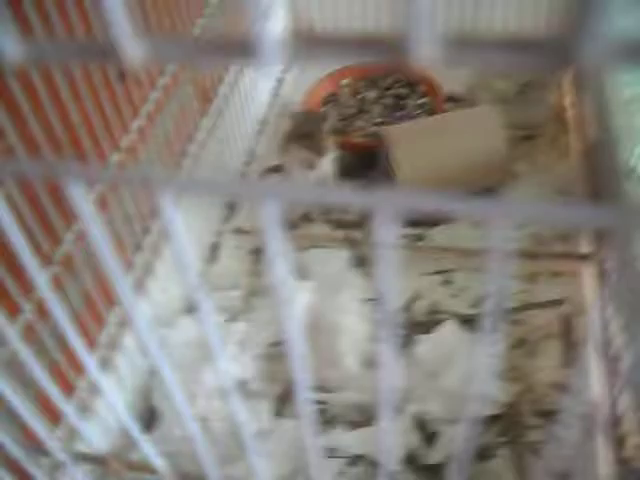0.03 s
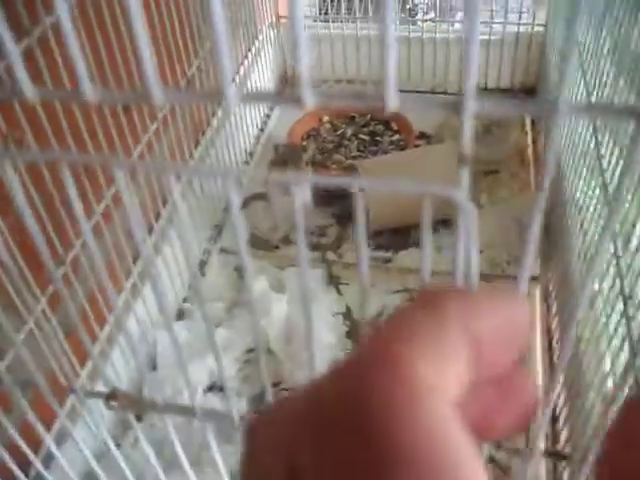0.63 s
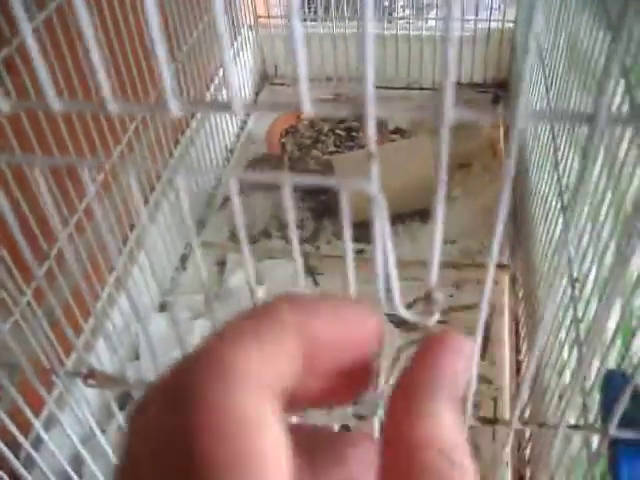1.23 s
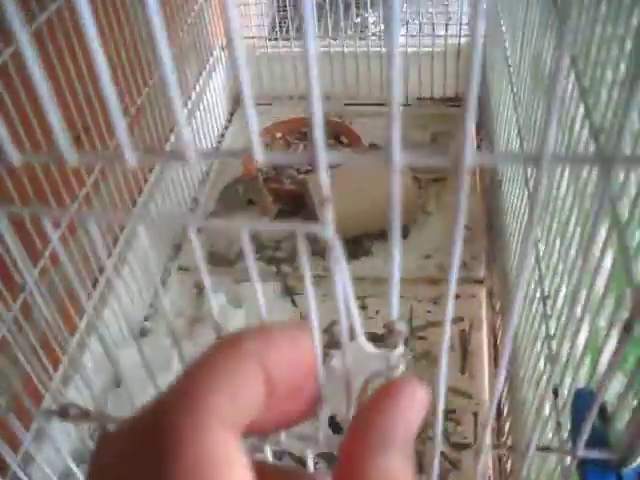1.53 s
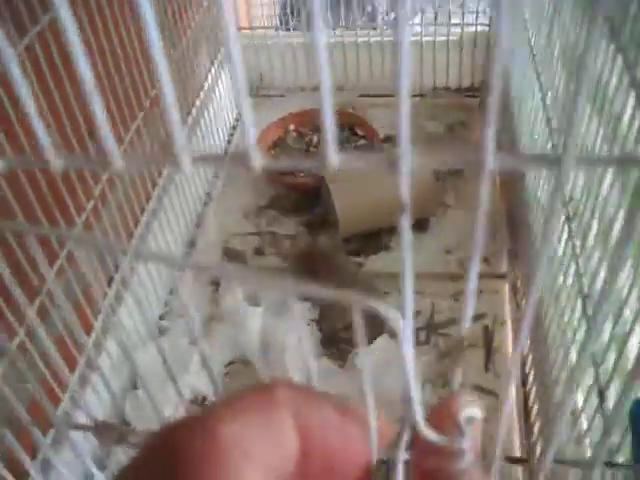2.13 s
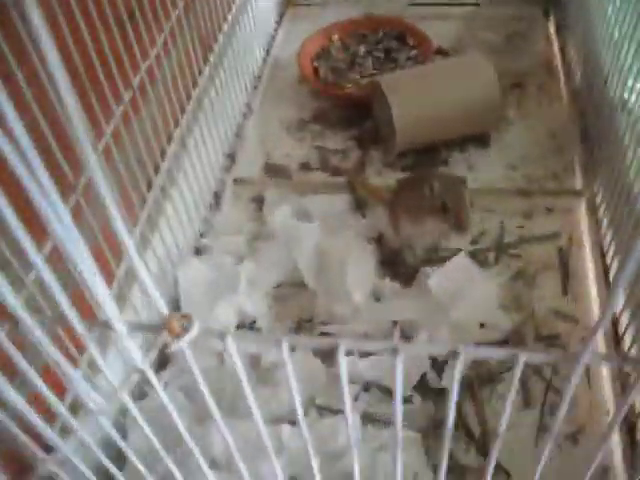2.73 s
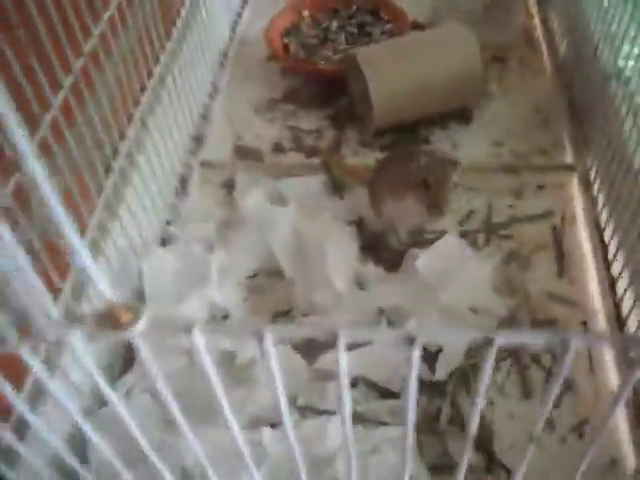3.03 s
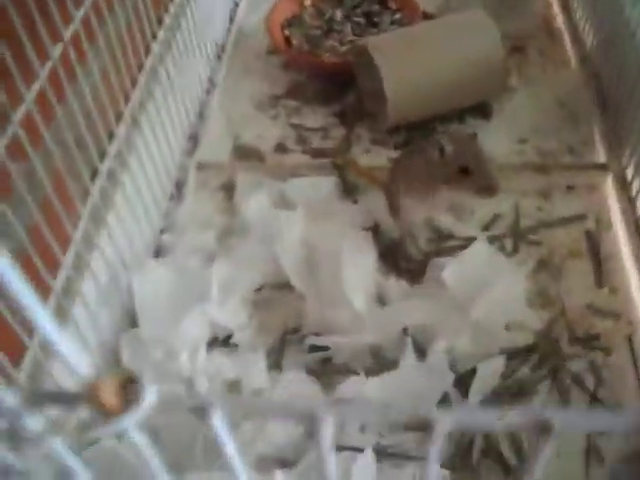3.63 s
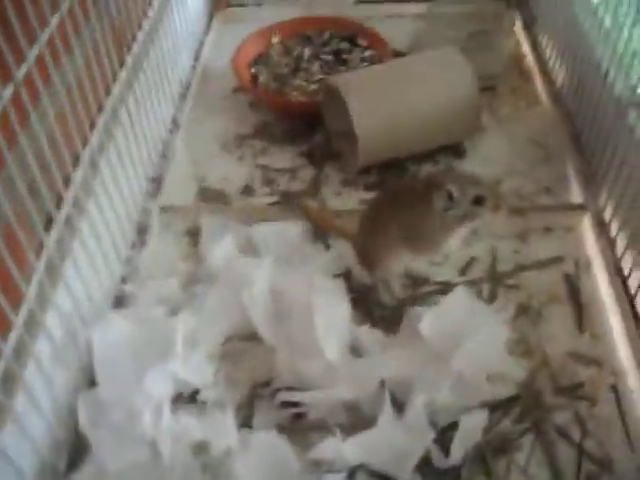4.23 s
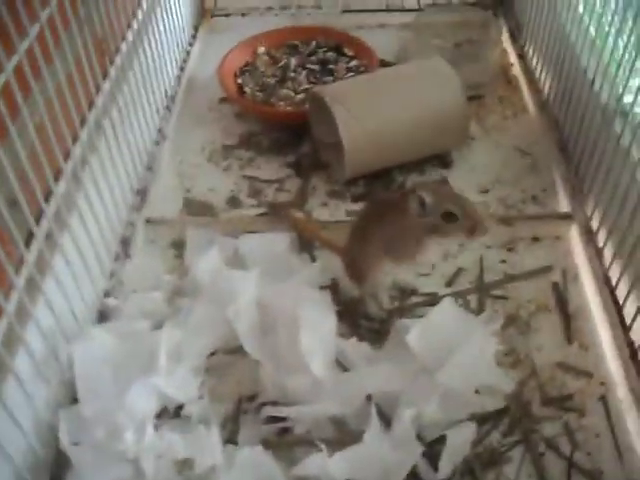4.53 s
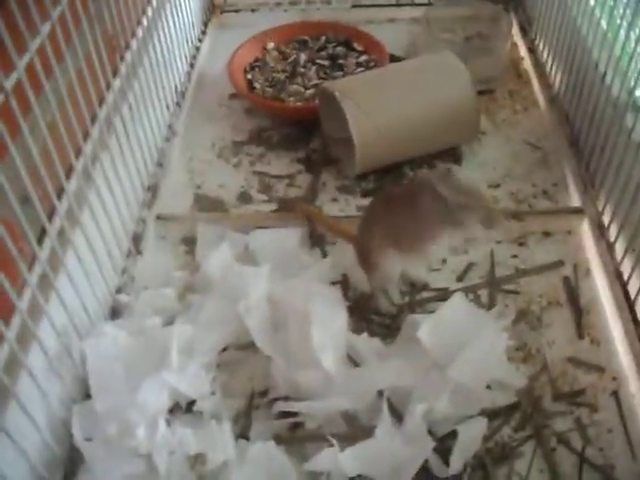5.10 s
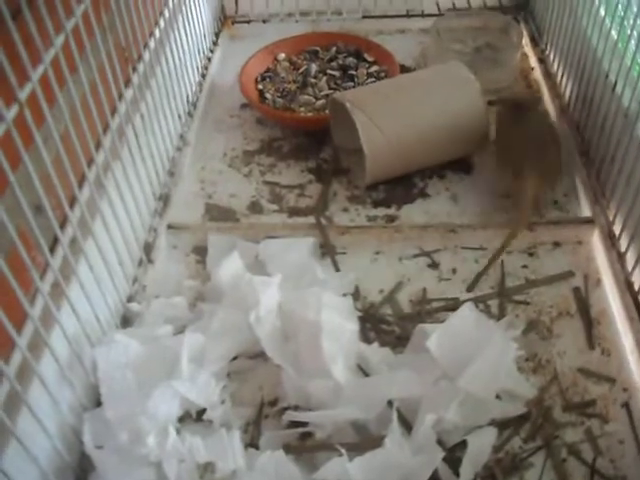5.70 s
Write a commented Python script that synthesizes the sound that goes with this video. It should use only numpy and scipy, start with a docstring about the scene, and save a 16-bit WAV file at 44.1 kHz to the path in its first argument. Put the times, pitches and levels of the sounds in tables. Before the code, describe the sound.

Close to the microphone, fingers work the latch of a small wire cage with light scrapes and soft bumps. The door springs open with a rattling clank, and the bars ring on briefly. A gerbil then scratches and rustles in its paper bedding, making small dry clicks, while the wire scrapes lightly a few more times. Birds call faintly far off, over the quiet room's low rumble and microphone hiss.

```python
"""Opening a gerbil's cage

Close to the microphone, fingers work the latch of a small wire cage; the door springs open with a
rattling clank and the bars ring on. A gerbil scratches and rustles in its paper bedding, and the hand
bumps softly. Far off, birds call faintly. The room is quiet: a low rumble under the hiss of a small
camera's microphone, which opens a moment late."""
import sys
import numpy as np
from scipy import signal
from scipy.fft import rfft, irfft
from scipy.io import wavfile
from scipy.ndimage import uniform_filter1d

SR = 44100
rng = np.random.default_rng(int(sys.argv[2]) if len(sys.argv) > 2 else 0)


def store_pcm(level_fs):
    """Save levels as 16-bit WAV."""
    pcm = np.round(np.clip(level_fs, -1, 1) * 32767).astype(np.int16)
    wavfile.write(sys.argv[1], SR, np.atleast_2d(pcm).T)


N = 254016

# spectrum of claws on dry paper: (frequency [Hz], relative level [dB])
CLAW_SPECTRUM = [(200, -19), (900, 0), (3000, 1), (6000, -2.5), (9500, -6), (12000, -31)]
# bouts of scrabbling paws: (start [s], length [s], crackle level [dB])
SCRABBLE_BOUTS = [(2.41, 0.33, -64.5), (3.063, 0.098, -60.5), (3.43, 0.24, -63.5), (3.759, .45, -68)]


def amp(db):
    """Decibels to gain."""
    return 10 ** (np.asarray(db) / 20)


def unit_rms(x):
    """Scales to rms 1."""
    return x / np.sqrt(np.mean(x ** 2) + 1e-20)


def curve_at(points, hz):
    """Joins (Hz, value) points by lines on a log-frequency axis."""
    point_hz, value = np.transpose(points)
    return np.interp(np.log(hz + 1), np.log(point_hz + 1), value)


def clock(length):
    """Sample times over a length in seconds."""
    return np.arange(max(int(length * SR), 2)) / SR


def add(mix, start, sound):
    """Mixes a sound in at a start time in seconds."""
    part = mix[round(start * SR):][:len(sound)]
    part += sound[:len(part)]


def coloured(x, spectrum):
    """Filters a signal by a (Hz, dB) spectrum, at rms 1."""
    gain = amp(curve_at(spectrum, np.fft.rfftfreq(len(x), 1 / SR)))
    return unit_rms(irfft(rfft(x) * gain, len(x)))


def resonate(x, hz, width_hz):
    """One resonance with a peak gain near 1."""
    radius = np.exp(-np.pi * width_hz / SR)
    return 2 * signal.lfilter([1 - radius], [1, -radius * np.exp(2j * np.pi * hz / SR)], x).real


def grains(size, per_s, spread_db):
    """Random clicks of either sign, a few of them large."""
    strength = amp(spread_db * np.minimum(rng.exponential(1, size), np.pi))
    return strength * rng.choice([-1, 1], size) * (rng.random(size) < per_s / SR)


def drift(per_s):
    """Random wandering with per_s turning points a second, rms 1."""
    knots = rng.standard_normal(N // 20)
    return unit_rms(np.interp(np.arange(N) / SR * per_s, np.arange(len(knots)), knots))


def room_tone(rumble_db=-54.5, waver_db=1.5, hiss_db=-72):
    """The quiet room: a rumble whose low end wavers gently, under steady microphone hiss."""
    # spectra of the room and of the microphone's own noise: (frequency [Hz], relative level [dB])
    room_spectrum = [(12, -27), (20, 0), (79, 0), (192, -7.5), (249, -12), (332, -14.5), (408, -16.5),
                     (544, -15), (782, -17.5), (1040, -16), (1220, -19.5), (2660, -25.5), (4350, -28),
                     (10000, -36.5), (13000, -69), (22000, -120)]
    hiss_spectrum = [(1000, 0.5), (5000, 0), (9000, 3.5), (10200, 3), (11000, -14), (11700, -13),
                     (12300, -36)]
    rumble = amp(rumble_db) * coloured(rng.standard_normal(N), room_spectrum)
    low_end = signal.sosfilt(signal.butter(2, 400, fs=SR, output="sos"), rumble)
    waver = low_end * (amp(waver_db * drift(per_s=21)) - 1)
    hiss = amp(hiss_db) * coloured(rng.standard_normal(N), hiss_spectrum)
    return rumble + waver + hiss


def twitter_notes(note_s=0.029, arch=0.079, spread_hz=224):
    """Far birds twitter in strings of tiny notes around one pitch; gives rows of bird calls."""
    # runs of twittering: (start [s], length [s], level [dB], pitch [Hz])
    runs = [(0.358, .5, -72, 4850), (1.452, .25, -72.5, 4500), (5.21, .08, -68.5, 4250)]
    return [(start + k * note_s, note_s, db, hz + spread_hz * step, arch)
            for start, length, db, hz in runs
            for k, step in enumerate(rng.standard_normal(20)) if k * note_s < length]


def distant_birds(hoarse_hz=75, scatter_db=-8, scatter_s=0.021):
    """Arched, slightly hoarse whistles, blurred by reflections on their long way to the microphone."""
    # single calls: (start [s], length [s], level [dB], top pitch [Hz], arch [share of the pitch])
    calls = [(2.819, 0.055, -59, 3910, 0.0083), (3.262, 0.056, -59.5, 4160, 0.028),
             (3.86, 0.073, -65, 3940, 0.043), (5.206, 0.059, -60, 1454, 0.146),
             (5.649, 0.1, -57.5, 1835, 0.59)]
    direct = np.zeros(N)
    for start, length, db, hz, arch in calls + twitter_notes():
        position = np.linspace(-1, 1, len(clock(length)))
        pitch = hz * (1 - arch * position ** 2) + hoarse_hz * drift(per_s=400)[:len(position)]
        swell = np.sqrt(1 - position ** 2)
        add(direct, start, amp(db) * swell * np.sin(2 * np.pi * np.cumsum(pitch) / SR))
    t = clock(0.2)
    reflections = rng.standard_normal(len(t)) * np.exp(-t / scatter_s)
    reflections /= np.linalg.norm(reflections)
    return direct + amp(scatter_db) * signal.fftconvolve(direct, reflections)[:N]


def hand(width_hz=220, decay_s=0.022, rise_s=0.0012):
    """Soft flesh gives dull, quickly damped bumps."""
    # bumps of the hand: (time [s], level [dB], pitch [Hz])
    bumps = [(.52, -47, 680), (.526, -41.5, 300), (.637, -52, 430), (1.155, -52, 303), (3.619, -48, 320),
             (4.082, -51.5, 298), (5.292, -52, 513), (5.325, -52.5, 268), (5.599, -52.5, 152)]
    out, t = np.zeros(N), clock(0.54)
    for start, db, hz in bumps:
        thud = resonate(rng.standard_normal(len(t)), hz, width_hz)
        thud = unit_rms(resonate(thud, hz, 3 * width_hz))
        add(out, start, amp(db) * thud * np.exp(-t / decay_s) * (1 - np.exp(-t / rise_s)))
    return out


def movements(rows, attack_s=0.0091, release_s=0.037):
    """Gain over time of (start, length, dB) movements: each swells quickly, holds and dies away."""
    gain = np.zeros(N)
    for start, length, db in rows:
        t = clock(length + 1)
        release = np.exp(-np.maximum(t - length, 0) / release_s)
        add(gain, start, amp(db) * np.minimum(t / attack_s, 1) * release)
    return gain


def bedding(rustle_db=-4, clump_db=4.5, crease_s=0.0018, fidget_from_s=3.1, fidget_db=-66):
    """Shifting paper: a dull grainy rustle, and sparse bright crackles as creases give way."""
    # spectrum of the rustling paper: (frequency [Hz], relative level [dB])
    paper_spectrum = [(150, -5), (500, -4), (1100, 2), (2000, -7), (4000, -20), (9000, -27.5), (12000, -52)]
    # the gerbil shifts its body: (start [s], length [s], level before rustle_db [dB])
    stirs = [(2.995, .09, -56), (3.45, 0.19, -61), (3.9, .4, -57.5), (4.64, 0.031, -54.5), (5.22, .2, -63)]
    fidget = movements([(fidget_from_s, N / SR, fidget_db)])  # out in the open it never keeps still
    stirring = np.hypot(movements(stirs), fidget)
    paper = coloured(grains(N, per_s=1500, spread_db=3.5), paper_spectrum)
    crease_decay = np.exp(-clock(0.02) / crease_s)
    creases = signal.fftconvolve(abs(grains(N, per_s=300, spread_db=3.0)), crease_decay)[:N]
    crackle = coloured(creases * rng.standard_normal(N), CLAW_SPECTRUM)
    rustle = paper * stirring * amp(rustle_db + clump_db * drift(per_s=25))
    return rustle + crackle * movements(SCRABBLE_BOUTS)


def small_snaps(per_s=17, lift_db=15.5, spread_db=0.5, hz=2680, spread_octaves=0.51, crumble_db=-6):
    """Light claw contacts fall at random through each bout; gives rows of gerbil snaps."""
    rows = []
    for start, length, crackle_db in SCRABBLE_BOUTS:
        for k, (jitter, force, detune) in enumerate(rng.standard_normal((20, 3))):
            delay = abs(k + jitter / 2) / per_s
            db = crackle_db + lift_db + spread_db * force
            if delay < length:
                rows.append((start + delay, db, hz * 2 ** (spread_octaves * detune), crumble_db))
    return rows


def gerbil(gain_db=-3, ring_db=7, snap_s=0.00031, crumble_s=0.0055, echo_db=-22, echo_s=0.026):
    """Claws and teeth on paper, seed and tray: dry snaps that ring and crumble, with a trace of room."""
    # the sharpest snaps: (time [s], peak before gain_db [dB], pitch [Hz], crumble against snap [dB])
    sharp_snaps = [(0.845, -47.5, 2460, -3), (2.4006, -44, 2840, 1), (2.567, -55, 3390, -2),
                   (2.8785, -43, 3230, -10), (3.104, -57, 1900, -5), (3.1423, -50.5, 2820, -1),
                   (3.3605, -44.5, 3100, -8), (3.3842, -45, 2980, -4), (3.458, -42, 1920, -5),
                   (3.61, -40.5, 1800, -4), (3.6236, -37.5, 2400, -9), (3.644, -46, 2440, -2),
                   (3.6737, -43, 3200, -14), (3.9134, -50, 3120, -4), (3.9466, -41.5, 5000, -6),
                   (4.0402, -42, 4630, 2), (4.137, -44.5, 4770, -2), (4.2846, -43, 1810, -6),
                   (4.4105, -45, 1680, 0), (4.8592, -46, 2350, -1), (5.013, -46, 1900, -4),
                   (5.142, -50, 2430, -8)]
    out, t = np.zeros(N), clock(0.22)
    for start, db, hz, crumble_db in sharp_snaps + small_snaps():
        fibres = coloured(rng.standard_normal(len(t)), CLAW_SPECTRUM)
        cutoff_hz = min(3.4 * hz, SR / 3)  # thicker pieces ring lower and carry less treble
        fibres = signal.sosfilt(signal.butter(1, cutoff_hz, fs=SR, output="sos"), fibres)
        fibres += amp(ring_db) * resonate(fibres, hz, width_hz=800)
        snap = (t / snap_s * np.exp(1 - t / snap_s)) ** 2
        tail = amp(crumble_db) * np.exp(-t / crumble_s) + amp(echo_db) * np.exp(-t / echo_s)
        scratch = fibres * (snap + tail * (1 - np.exp(-t / snap_s)))
        peak = np.sqrt(uniform_filter1d(scratch ** 2, size=44).max())  # loudest millisecond
        add(out, start, amp(db + gain_db) * scratch / peak)
    return out


def cage_knock(tilt_db, clatter_t60=0.15, rise_s=0.00025, return_gain=0.27, return_s=0.01197):
    """One knock on the cage: a brief clatter, then the dense afterring of many wires."""
    # spectrum of the struck cage: (frequency [Hz], relative level [dB])
    cage_spectrum = [(35, -9), (80, -3), (180, -5), (310, -7), (370, -15.5), (490, -6.5), (600, -1),
                     (800, -3.5), (1200, -7.5), (1900, -10), (3300, -15), (4000, -19), (8000, -26),
                     (10000, -32.5), (12000, -62)]
    # bands in which the wires ring on: (centre [Hz], level against the clatter [dB], t60 [s])
    ring_bands = [(90, -29, 0.31), (380, -11, 1.4), (680, -15.5, 2.98), (944, -16, 0.75), (1850, -13, 0.9),
                  (3200, -15, 0.66), (8800, -34.5, 0.42)]
    t = clock(2)
    hz = np.fft.rfftfreq(len(t), 1 / SR)
    treble_db = tilt_db * np.log2(np.hypot(1, hz / 900))  # a harder contact lifts the treble
    wires = rfft(rng.standard_normal(len(t))) * amp(curve_at(cage_spectrum, hz) + treble_db)
    # the shock comes back inverted from the far frame, which ribs the spectrum
    wires *= 1 - return_gain * np.exp(-2j * np.pi * hz * return_s)
    wires /= np.std(irfft(wires))
    centres = [row[0] for row in ring_bands]
    sound = np.zeros(len(t))
    for share, (_, db, t60) in zip(np.eye(len(centres)), ring_bands):
        band = irfft(wires * curve_at(list(zip(centres, share)), hz))
        sound += band * np.hypot(amp(-60 * t / clatter_t60), amp(db - 60 * t / t60))
    return sound * (1 - np.exp(-t / rise_s))


def bar_tones(energy, waver_hz=3.18):
    """Each bar stores the energy of the knocks and rings it out, wavering as the loose door leans on it."""
    # clearest tones of tray and bars: (frequency [Hz], relative level [dB], t60 [s])
    modes = [(97.7, 4, 0.27), (170, -6, 0.94), (512, -9.5, 0.96), (554, 5.5, 0.28), (587, -19.5, 3.5),
             (630, -12, 0.5), (709, -14, 5), (724, 4.5, 0.41), (768, 2.5, 0.39), (820, 0, 0.42),
             (873, -11, 0.31), (974, -4.5, 0.44), (1045, -14, 1.3), (1203, -21, 0.45), (1230, -13, 0.82),
             (1412, -6, 0.25), (1680, -9, 0.82), (1767, -4, 0.33), (1710, -20, 2.1), (1935, -5.5, 0.82),
             (1968, -3, 0.54), (2405, -2, 0.15), (2530, -22, 0.3), (2760, -7, 0.21), (3006, -2.5, 0.19)]
    out = np.zeros(N)
    for hz, db, t60 in modes:
        stored = signal.lfilter([1], [1, -amp(-120 / (t60 * SR))], energy + 1e-24)
        pitch = hz + waver_hz * drift(per_s=30)
        out += amp(db) * np.sqrt(stored) * np.sin(2 * np.pi * np.cumsum(pitch) / SR)
    return out


def bounces(last_blow, gap_s=0.031, loss_db=3.5, dulling_db=1):
    """The door settles in three evenly spaced bounces, each weaker and duller; gives rows of blows."""
    start, db, tilt_db = last_blow
    return [(start + k * gap_s, db - k * loss_db, tilt_db - k * dulling_db) for k in (1, 2, 3)]


def cage_door(bars_db=-15):
    """Close up: hard blows, and trains of tiny slips at the latch and hinge, all shake the same cage."""
    # the door hits the frame: (time [s], level [dB], treble tilt [dB/octave])
    blows = [(2.054, -38, 6.5), (2.060, -29, -1), (2.067, -27, -1), (2.080, -35, 1), (2.091, -32, 0.5),
             (2.102, -31, 1), (2.135, -39, 4)]
    # wire slips on wire: (start [s], length [s], level [dB], treble tilt [dB/octave])
    scrapes = [(0.26, 0.032, -56.5, -8), (0.923, 0.065, -50, -5.5), (1.334, 0.047, -48.5, -10),
               (1.363, 0.056, -48, -2), (1.712, 0.033, -50, -4.5), (1.779, 0.063, -50, -4.5),
               (3.005, 0.1, -52, -7), (3.448, 0.085, -52, -11.5), (3.605, 0.043, -59, 2),
               (4.575, .035, -58.5, -4), (4.64, 0.033, -55.5, -2.5)]
    out, energy = np.zeros(N), np.zeros(N)
    for start, db, tilt_db in blows + bounces(blows[-1]):
        add(out, start, amp(db) * cage_knock(tilt_db))
        add(energy, start, [amp(db) ** 2])
    for start, length, db, tilt_db in scrapes:
        size = len(clock(length))
        slips = grains(SR, per_s=300, spread_db=4)[:size]
        slips[0] = 2.8  # the wire breaks loose with a jerk
        scrape = signal.fftconvolve(slips, cage_knock(tilt_db))
        add(out, start, amp(db) * scrape / np.std(scrape[:size + size // 2]))
        add(energy, start, np.full(size, amp(db) ** 2 / size))
    return out + amp(bars_db) * bar_tones(energy)


def scene():
    """Cage, room and far birds at one microphone."""
    return (cage_door() + room_tone() + bedding() + hand() + gerbil() + distant_birds())[None]


def record(dry, opens_s=0.258, cutoff_hz=12200):
    """The camera's microphone opens a moment late and loses the highest treble."""
    live = dry * (np.arange(N) / SR >= opens_s)
    lowpass = signal.firwin(511, cutoff_hz, window=("kaiser", 9), fs=SR)
    return signal.oaconvolve(live, lowpass[None], "same")


dry = scene()
out = record(dry)
store_pcm(out)
```